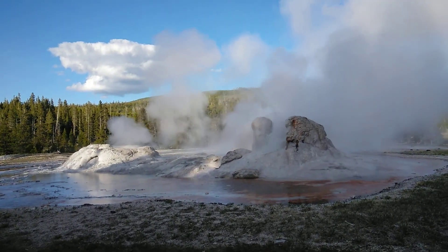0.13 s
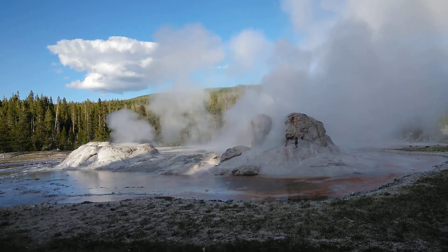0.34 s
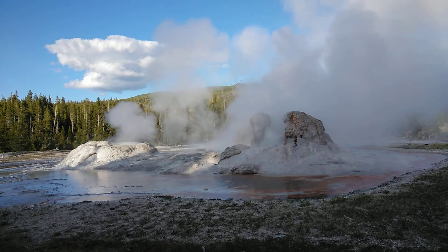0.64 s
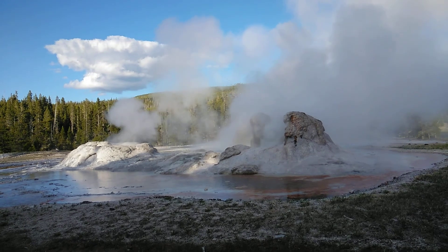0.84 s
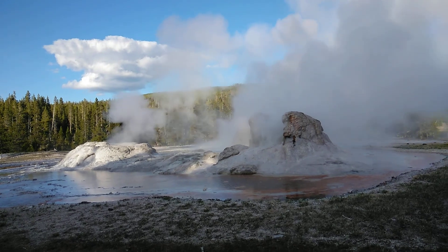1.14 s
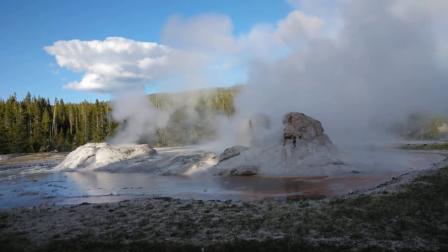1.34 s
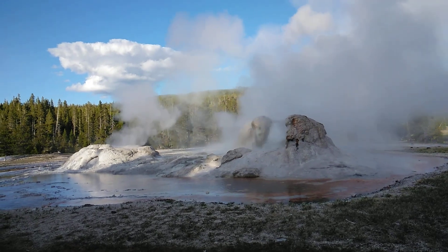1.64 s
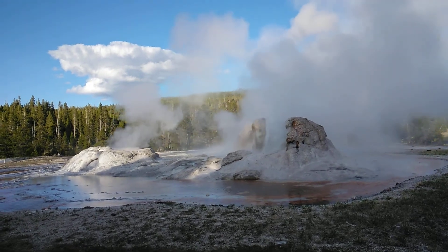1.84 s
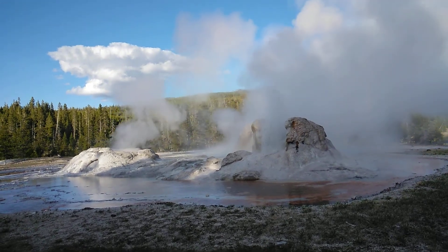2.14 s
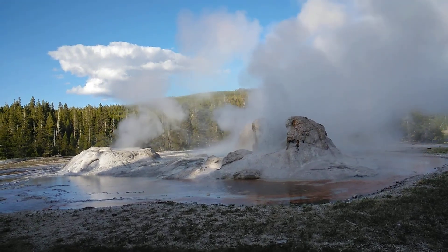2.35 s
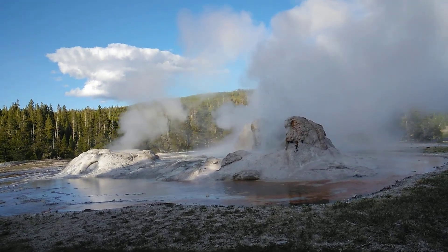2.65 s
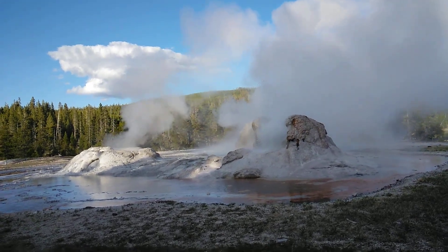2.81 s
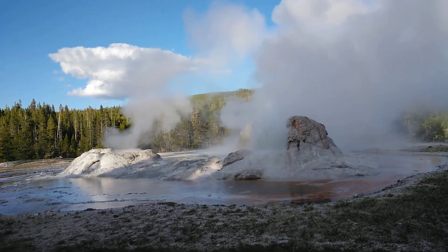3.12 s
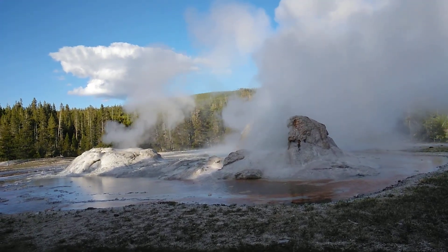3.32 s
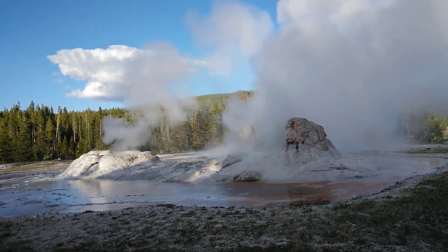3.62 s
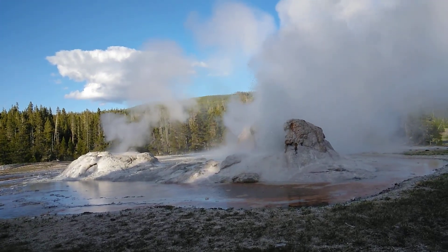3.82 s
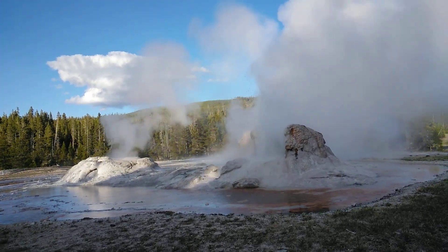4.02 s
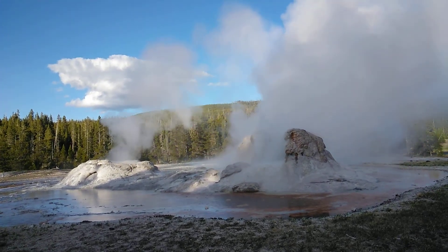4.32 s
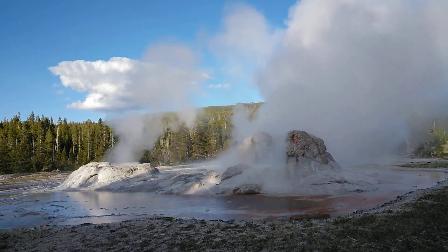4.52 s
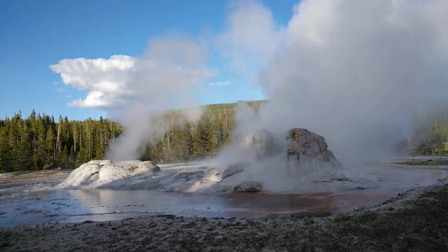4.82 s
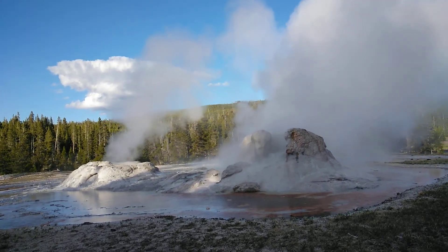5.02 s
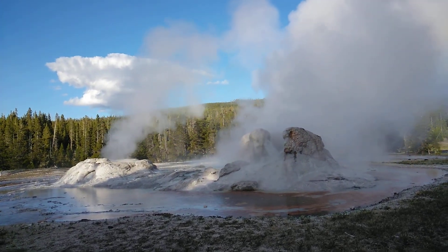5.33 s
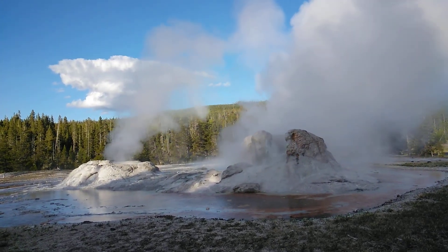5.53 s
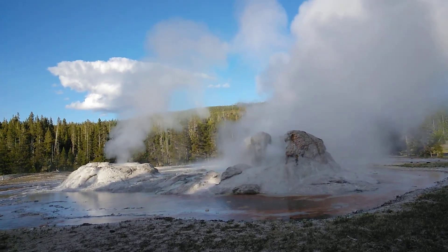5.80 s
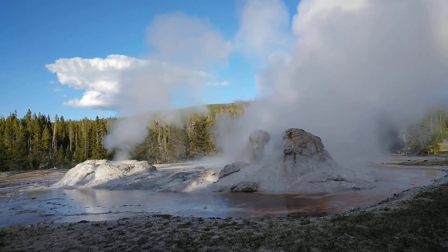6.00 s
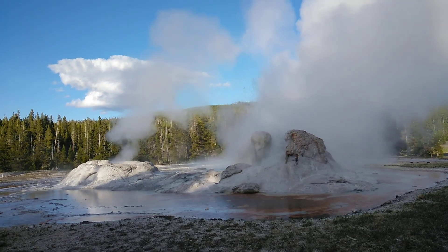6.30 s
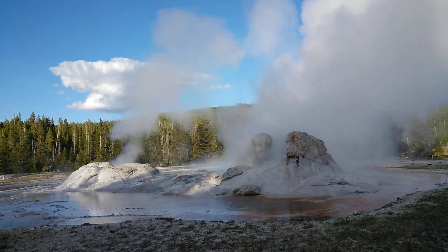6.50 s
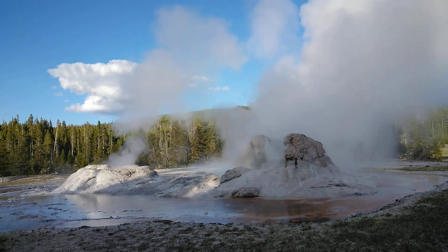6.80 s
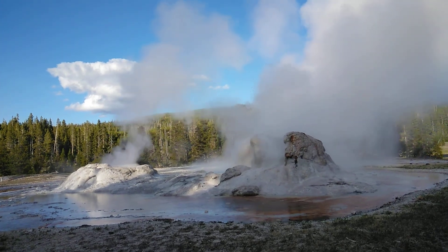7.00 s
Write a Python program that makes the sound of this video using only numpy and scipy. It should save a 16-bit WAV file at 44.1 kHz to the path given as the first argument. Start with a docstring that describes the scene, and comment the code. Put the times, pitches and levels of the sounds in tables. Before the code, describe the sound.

Low gusty wind and a throaty vent rumble run from start to end, in open air across a pool. From 0 to 1 s, splashing and steam hiss are moderate and rather dull, easing near 0.6 s. They rise a little around 1.0-1.5 s, then the hiss drops abruptly near 1.9 s. From 2.3 s the jet builds; at about 2.75 s wet slaps crowd in and bright spray patters. The strongest burst comes around 3.2-3.4 s, with sharp cracks and dense hiss. It eases near 3.85 s, then heavy splashing swells again around 4.3-4.7 s. After 4.9 s it collapses; 5.2-6.0 s is sparse, dark and mostly rumble, with faint dabs of water. From 6.1 s splash and hiss half return, modestly, to the end. Camera stereo, duller on the right, with patchy faint treble.

```python
"""A geyser across a shallow pool, on a camera's two microphone ports: wind and vent rumble low from the start.
Steam hisses from the cone, spray patters and heavier water splashes, all shaped from patchy noise and random drops.
Wet slaps join as short cracks of noise; the jet surges to its height midway, then drops to a faint lull and half recovers.
The ports colour the sound differently, and a level-dependent gain thins faint bands,
so the lull sounds sparse and dark."""
import sys
import numpy as np
from scipy import signal
from scipy.fft import rfft, irfft, next_fast_len
from scipy.io import wavfile
from scipy.ndimage import uniform_filter1d, map_coordinates

SR = 44100
rng = np.random.default_rng(int(sys.argv[2]) if len(sys.argv) > 2 else 0)


def dump_mix(stems):
    """Bounce the given channels to the path in sys.argv[1] as a 16-bit WAV at rate SR."""
    frames = np.atleast_2d(stems).T  # one column per channel
    limited = np.clip(frames, -1, 1)  # hard clip at full scale
    pcm = np.round(limited * 32767).astype(np.int16)
    wavfile.write(sys.argv[1], SR, pcm)


N = 315298  # length in samples

# Source levels are those ahead of the ports and the thinning of faint bands.
# Wind's rumble. Each row: time in seconds, level in dB.
WIND_LEVEL = [(0, -36), (0.14, -37), (0.32, -44), (0.5, -38.5), (0.66, -34), (0.78, -40), (0.98, -39),
              (1.2, -41), (1.32, -39), (1.65, -38.5), (1.95, -45.5), (2.65, -38.5), (3.05, -42),
              (3.38, -39.5), (3.83, -45), (4.05, -40), (4.5, -42), (4.78, -38.5), (5.17, -46.5),
              (5.52, -40.5), (5.8, -41), (6.15, -41), (6.5, -43), (6.8, -39), (7.15, -44)]
# Flutter of the wind within a gust: dB per unit of wobble, knots per second.
GUST_FLUTTER_DB, GUST_KNOTS_PER_S = 1.0, 12
# Low roar of the vent. Each row: time in seconds, level in dB ahead of the heaves.
ROAR_LEVEL = [(0, -40), (0.9, -40.5), (1.1, -42), (1.7, -37.5), (2.08, -42), (2.25, -39), (2.9, -39.5),
              (3.7, -38.5), (3.83, -40.5), (3.95, -38), (4.8, -40.5), (5.15, -42), (5.7, -42), (6.0, -43.5),
              (6.55, -43), (7.15, -42)]
# Heaves of the roar. Each row: centre in seconds, lift in dB (a dip if negative).
ROAR_HEAVES = [(0.65, 3), (1.32, 5.5), (1.6, -1.5), (3.4, 4), (4.74, 1.5), (5.46, 3), (6.97, 5)]
HEAVE_WIDTH_S = 0.06
# Strength of the jet. Each row: time in seconds, level of its steam hiss in dB ahead of the spurts.
JET_LEVEL = [(0.0, -40.5), (0.6, -43.5), (1.05, -37.5), (1.39, -36), (1.72, -41), (1.85, -39.5),
             (1.885, -49), (2.02, -47.5), (2.49, -40), (2.81, -31.5), (3.15, -30), (3.37, -24),
             (3.85, -33.5), (4.62, -28.5), (4.93, -33.5), (5.19, -48.5), (5.5, -53), (5.63, -52),
             (5.73, -48), (5.83, -52.5), (6.02, -49), (6.33, -44), (6.6, -45.5), (6.9, -43.5), (7.15, -45)]
# Thrown water follows the jet: its dB when the jet is at the reference dB, and dB gained per dB of jet.
SPRAY_DB, JET_REF_DB, SPRAY_DB_PER_JET_DB = -37, -35, 0.86
# Heavy water falling into the pool. Each row: time in seconds, level in dB ahead of the spurts.
FALL_LEVEL = [(0.0, -40.5), (0.65, -43.5), (1.05, -41), (1.3, -40), (1.75, -39.5), (1.97, -43.4),
              (2.35, -41.5), (2.75, -39), (3.1, -40), (3.35, -37.3), (3.83, -39), (4.1, -37.5), (4.45, -35),
              (4.85, -37.5), (5.02, -41.5), (5.16, -47.5), (5.33, -48), (5.58, -50.5), (5.82, -49),
              (5.99, -52), (6.11, -47), (6.35, -44.5), (6.7, -46.5), (7.15, -47)]
# Brightness of the splash. Each row: time in seconds, dB added above the split and taken away below it.
SPLASH_BRIGHTNESS = [(0, -1.7), (0.6, -0.9), (1.5, -0.5), (2.0, -0.7), (2.7, 0.5), (3.4, 0), (4.4, 0.8),
                     (5.1, 1), (5.5, -0.8), (6.0, 0.5), (6.4, 1.7), (7.15, -0.4)]
SPLASH_SPLIT_HZ = 1230
# The biggest clots slapping the rock. Each row: start in seconds, level in dB ahead of tilt and colour,
# brightness in dB per octave about the pivot.
SLAP_HITS = [(0.814, -45, 0), (1.041, -28, -2), (1.84, -31, 3), (2.154, -38, 0), (2.668, -31, 1),
             (2.702, -25, 0), (2.757, -31, -2), (2.768, -21, -1), (2.774, -22, -1), (2.803, -32, 0),
             (2.908, -20, -2), (2.97, -19.5, 2), (3.065, -24, 7), (3.186, -17, 3), (3.331, -19, 3),
             (3.335, -13, 3), (3.389, -15.5, 4), (3.491, -23, 1), (3.981, -29, -1), (3.996, -30, -2),
             (4.297, -23, -2), (4.304, -23, -2), (4.838, -23, 0), (4.907, -25, -3), (5.73, -39, 0),
             (5.76, -43, -2), (6.33, -40, 0), (6.464, -35, 2)]
SLAP_PIVOT_HZ = 7000
# Spurts: brief level changes of spray and splash. Each row: centre in seconds, change in dB (a dip if negative).
SPURT_CHANGES = [(1.18, 3), (1.31, 1.5), (2.77, 4.5), (2.91, 1.5), (2.97, 4), (3.34, 2.5), (3.99, 2),
                 (4.3, -1), (4.41, 4.5), (5.74, 0), (6.34, -0.5)]
SPURT_RISE_S, SPURT_FALL_S = 0.039, 0.027  # time constants of the change in dB, before and after its centre
SPURT_STEAM_SHARE = 0.32  # part of the change that the steam gets
# The colour of spray and splash drifts as the plume sways: depth in dB per unit, ripple spacing, speed.
SWAY_DB, SWAY_SPACING_HZ, SWAY_KNOTS_PER_S = 1.05, 218.4, 5

# Colour of each source. Each row: frequency in Hz, relative gain in dB.
WIND_COLOUR = [(20, -22), (40, -14), (65, -0.5), (95, 2), (140, -1.5), (250, -18), (600, -51)]
THROAT_COLOUR = [(40, -28), (80, -12.5), (125, 0.5), (170, -1.9), (240, -1), (320, -7), (420, -13.5),
                 (600, -24.5), (1200, -37.5), (3000, -62)]
STEAM_COLOUR = [(2500, -25.5), (4500, -8.5), (6000, -6), (6700, -5.5), (7500, -3.5), (8400, -5),
                (9200, -0.5), (9800, -0.5), (11000, -2), (12000, -4.5), (13200, -16.5), (14200, -16.5),
                (15300, -48)]
SPRAY_COLOUR = [(1500, -37), (2250, -12), (2750, -8.5), (3150, -15.5), (3900, -9.5), (4400, -3.5),
                (4750, -1), (5000, -1.5), (5350, -4.5), (5800, -9.5), (7000, -16.5), (12000, -44)]
SPLASH_COLOUR = [(200, -11), (450, 0), (650, 1), (780, 0.5), (1100, -0.5), (1600, -0.5), (2300, -1),
                 (2700, -3), (3500, -4.5), (5000, -8), (9000, -49)]
SLAP_COLOUR = [(300, -28), (1500, -7), (3500, -3.5), (5000, 4.5), (7000, -0.5), (10500, 7.5), (12500, -1),
               (15000, -28)]

# Shading of the right microphone port, chiefly in the treble. Each row: frequency in Hz, dB against the left.
RIGHT_SHADE = [(50, -2), (250, -1.5), (800, -4.5), (1600, -4.5), (2700, -4), (3300, 2), (4100, -5),
               (5000, -10.5), (6300, -7.5), (7500, -11.5), (9500, -20), (11500, -25.5), (13000, -17)]
# Narrow dips and peaks of each port, ahead of their drift. Each row: centre in Hz, width in Hz, gain in dB.
LEFT_NOTCHES = [(580, 78, -7.2), (1310, 100, -7), (1945, 87, -3.5), (3000, 250, 0), (3900, 74, -2.5),
                (5130, 150, 1), (6550, 120, -6), (8600, 120, 0.5)]
RIGHT_NOTCHES = [(595, 76, -7.8), (1370, 150, -0.5), (2080, 180, -1), (2870, 140, -2.5), (3630, 280, -3.5),
                 (3980, 110, 2.5), (4570, 230, -4), (5480, 150, -4)]
# Wander of the port responses in Hz, swing of dip depth (exponent), both per unit of wobble; knots per second.
DRIFT_HZ, DIP_SWING, DRIFT_KNOTS_PER_S = 32, 0.27, 9
# Likeness between the ports. Each row: frequency in Hz, likeness from 0 to 1.
PORT_LIKENESS = [(30, 0.92), (100, 1), (300, 0.99), (480, 0.93), (580, 0.94), (780, 0.89), (1100, 0.88),
                 (1300, 0.89), (1600, 0.68), (2000, 0.49), (2220, 0.55), (2800, 0.4), (2910, 0.985),
                 (3070, 0.94), (3160, 0.35), (3300, 0.59), (3430, 0.72), (3620, 0.68), (3880, 0.85),
                 (4050, 1), (4500, 0.39), (4900, 0.78), (5400, 0.36), (8000, 0.2), (13000, 0.11)]
# Phase between the ports. Each row: frequency in Hz, radians by which the left leads.
LEFT_LEAD = [(50, 3.5), (500, 3.5), (1100, 3.5), (1500, 4.5), (1850, 3.5), (2600, 4.5), (2900, 3.5),
             (3080, 4), (3190, -0.16), (3800, -0.1), (4350, 1.5), (4650, 1), (5400, 0.5), (7000, 0.4),
             (9500, 5.5)]
# Faint bands are turned down below this. Each row: frequency in Hz, threshold in dB per Hz ahead of its patches.
FAINT_THRESHOLD = [(100, -89), (400, -76.5), (490, -80), (640, -77.5), (800, -80), (1150, -82.5),
                   (1340, -80), (1600, -83), (1980, -83), (2400, -85.5), (3050, -82.5), (3400, -86),
                   (3800, -84), (4300, -89.5), (5000, -89.5), (10000, -105), (12500, -111), (15000, -110)]
TOP_HZ = 15550  # nothing is heard above this


def amp(db):
    """Decibels to gain."""
    return 10 ** (np.asarray(db) / 20)


def unit(x):
    """Scale to rms 1."""
    return x / np.sqrt(np.mean(x ** 2) + 1e-20)


def along(points, hz):
    """Read (Hz, value) points on a log frequency axis."""
    f, v = np.transpose(points)
    return np.interp(np.log(hz + 1), np.log(f + 1), v)


def curve(rows):
    """Draw (seconds, value) rows as one value per sample."""
    s, values = np.transpose(rows)
    return np.interp(np.arange(N) / SR, s, values)


def wobble(rate):
    """A smooth random curve through normal knots, rate of them a second."""
    knots = rng.standard_normal(int(N * rate / SR) + 4)
    return map_coordinates(knots, [np.arange(N) * rate / SR])


def filtered(x, response):
    """Multiply the spectrum of x by a response of frequency."""
    size = next_fast_len(N + SR // 2)
    hz = np.fft.rfftfreq(size, 1 / SR)
    return irfft(rfft(x, size) * response(hz), size)[..., :N]


def coloured(x, colour):
    """Shape x with a colour table, then bring it to rms 1."""
    return unit(filtered(x, lambda hz: amp(along(colour, hz))))


def smoothed(x, bands):
    """Running mean over neighbouring bands and seven time frames."""
    return uniform_filter1d(uniform_filter1d(x, size=bands, axis=-2), size=7, axis=-1)


def turbulence(patchy_db):
    """Two unrelated noises that share drifting patches of gain in time and frequency."""
    z = signal.stft(rng.standard_normal((2, N)), nperseg=1024)[2]
    patches = unit(smoothed(rng.standard_normal(z.shape[1:]), bands=4))
    return unit(signal.istft(z * amp(patchy_db * patches), nperseg=1024)[1][:, :N])


def rumble():
    """Wind gives a deep gusty rumble; above it the vent's throat roars and heaves now and then."""
    t = np.arange(N) / SR
    heave_db = sum(db * np.exp(-((t - s) / HEAVE_WIDTH_S) ** 2) for s, db in ROAR_HEAVES)
    roar_db = curve(ROAR_LEVEL) + heave_db + 0.77 * wobble(14)
    roar = amp(roar_db) * coloured(turbulence(patchy_db=2.0), THROAT_COLOUR)
    wind_db = curve(WIND_LEVEL) + GUST_FLUTTER_DB * wobble(GUST_KNOTS_PER_S)
    wind = amp(wind_db) * coloured(turbulence(patchy_db=1.6), WIND_COLOUR)
    return roar + wind


def patter(rate, spread_db, t60):
    """Drops land at random, rate a second: tiny noise bursts dying 60 dB in t60 seconds, a few much larger."""
    where, chance = rng.random((int(rate * N / SR), 2)).T
    size_db = spread_db * np.minimum(-np.log(1 - chance), 4)
    hits = np.bincount((where * N).astype(int), amp(size_db) ** 2, N)
    power = signal.lfilter([1], [1, -amp(-60 / (t60 * SR)) ** 2], hits)
    return unit(np.sqrt(power) * rng.standard_normal((2, N)))


def steam(level_db):
    """Steam tears out of the cone as turbulent hiss, laced with fine mist."""
    mist = patter(rate=1500, spread_db=4.0, t60=0.0097)
    hiss = turbulence(patchy_db=2.0) + 0.6 * mist
    return amp(level_db + 0.28 * wobble(25)) * coloured(hiss, STEAM_COLOUR)


def spray(jet_db, spurt_db):
    """Thrown drops patter back onto the rock, their level following the jet."""
    level_db = SPRAY_DB + SPRAY_DB_PER_JET_DB * (jet_db - JET_REF_DB) + spurt_db
    drops = 1.6 * turbulence(patchy_db=1.6) + patter(rate=900, spread_db=5.0, t60=0.0097)
    return amp(level_db + 0.46 * wobble(22.01)) * coloured(drops, SPRAY_COLOUR)


def bubbles(rate, centre_hz, cycles, spread_db, count=600):
    """Air pockets ring for a few cycles in the pool, rising in pitch as they surface."""
    when, size, pitch, phase = rng.random((int(rate * N / SR), 4)).T[:, :, None]
    start_hz = centre_hz * 2 ** (2 * pitch - 1)  # within an octave either way
    turns = start_hz * np.arange(count) / SR
    ring = amp(abs(spread_db) * size ** 2) * np.exp(-turns / cycles) * (1 - np.exp(-turns))
    angle = 2 * np.pi * (turns * (1 + 0.021 * turns / cycles) + phase)
    at = ((when * N).astype(int) + np.arange(count)).ravel()
    # sine and cosine give each bubble a quarter turn between the two signals
    pair = [np.bincount(at, (ring * wave(angle)).ravel(), N)[:N] for wave in (np.sin, np.cos)]
    return unit(np.array(pair))


def splash(spurt_db):
    """Heavier water falls into the pool and churns up bubbles: thick slugs sound dull, thin sheets bright."""
    falling = patter(rate=700, spread_db=2.6, t60=0.014)
    churning = bubbles(rate=600, centre_hz=1500, cycles=5, spread_db=10)
    mix = turbulence(patchy_db=1.5) + 0.47 * falling + 0.17 * churning
    water = coloured(mix, SPLASH_COLOUR)
    deep = filtered(water, lambda hz: 1 / (1 + (hz / SPLASH_SPLIT_HZ) ** 6))
    tilt_db = curve(SPLASH_BRIGHTNESS) + 0.5 * wobble(12)
    tilted = amp(-tilt_db) * deep + amp(tilt_db) * (water - deep)
    return amp(curve(FALL_LEVEL) + spurt_db + 0.9 * wobble(14)) * tilted


def swaying(x):
    """Slow, broad swells and hollows drift through the spectrum."""
    hz, s, z = signal.stft(x, SR, nperseg=1024)
    knots = rng.standard_normal((160, 80))  # frequency by time
    places = np.meshgrid(hz / SWAY_SPACING_HZ, s * SWAY_KNOTS_PER_S, indexing="ij")
    field = map_coordinates(knots, places, mode="mirror")
    return signal.istft(z * amp(SWAY_DB * field), SR, nperseg=1024)[1][:, :N]


def slaps(t60):
    """Single clots of water hit with a short wet crack: thin ones bright, thick ones dull."""
    t = np.arange(SR // 40) / SR
    hz = np.maximum(np.fft.rfftfreq(len(t), 1 / SR), 1000)  # the tilt is level below 1 kHz
    octaves = np.log2(hz / SLAP_PIVOT_HZ)
    cracks = np.zeros((2, N))
    for s, db, tilt_db in SLAP_HITS:
        noise = rng.standard_normal((2, len(t)))
        burst = irfft(rfft(noise) * amp(tilt_db * octaves), len(t))
        cracks[:, round(s * SR):][:, :len(t)] += amp(db - 60 * t / t60) * burst
    return filtered(cracks, lambda hz: amp(along(SLAP_COLOUR, hz)))


def spurts():
    """Brief changes in dB, each growing quickly to its centre and fading faster after it."""
    t = np.arange(N) / SR
    change_db = 0
    for s, db in SPURT_CHANGES:
        distance = np.maximum((s - t) / SPURT_RISE_S, (t - s) / SPURT_FALL_S)
        change_db = change_db + db * np.exp(-distance)
    return change_db


def ports(pair):
    """Two unrelated signals reach the ports: partly alike, shifted in phase, each with its own wandering dips."""
    hz, s, (a, b) = signal.stft(pair, SR, nperseg=2048)

    def drift():
        """One wobble read at the time frames."""
        return np.interp(s, np.arange(N) / SR, wobble(DRIFT_KNOTS_PER_S))

    hz = np.abs(hz[:, None] + DRIFT_HZ * drift())

    def dips(rows):
        """Sum of bell-shaped dips and peaks in dB, each swinging in depth."""
        return sum(db * np.exp(DIP_SWING * drift() - ((hz - centre) / width) ** 2)
                   for centre, width, db in rows)

    turn = np.arccos(np.clip(along(PORT_LIKENESS, hz), 0, 0.999)) / 2
    common, apart = a * np.cos(turn), b * np.sin(turn)
    left = (common + apart) * amp(dips(LEFT_NOTCHES))
    right = (common - apart) * amp(dips(RIGHT_NOTCHES) + along(RIGHT_SHADE, hz))
    right = right * np.exp(-1j * along(LEFT_LEAD, hz))
    return signal.istft(np.array([left, right]), SR, nperseg=2048)[1][:, :N]


def scene():
    """The jet drives hiss and spray; they surge and flutter together, and spurts move the splash too."""
    jet_db = curve(JET_LEVEL) + 0.75 * wobble(20)
    spurt_db = spurts()
    low = rumble()
    hiss = steam(jet_db + SPURT_STEAM_SHARE * spurt_db)
    water = swaying(spray(jet_db, spurt_db) + splash(spurt_db)) + slaps(t60=0.008)
    return ports(low + hiss + water)


def thin_faint(x, depth_db, steep, patchy_db):
    """Turn down bands of low running power, to depth_db at most; a random field makes faint hiss patchy."""
    hz, _, z = signal.stft(x, SR, nperseg=1024, scaling="psd")
    power = np.abs(smoothed(2 * np.abs(z) ** 2, bands=2)) + 1e-20
    patchiness = unit(smoothed(rng.standard_normal(z.shape[1:]), bands=4))
    threshold = amp(along(FAINT_THRESHOLD, hz)[:, None] + patchy_db * patchiness)
    gain = 1 / np.sqrt(1 + (threshold ** 2 / power) ** steep)
    gain = np.maximum(gain, amp(depth_db))
    return signal.istft(z * gain, SR, nperseg=1024, scaling="psd")[1][:, :N]


def record(dry):
    """Faint bands are thinned and nothing is kept above the band limit."""
    thinned = thin_faint(dry, depth_db=-18, steep=4.1, patchy_db=2.0)
    return filtered(thinned, lambda hz: hz < TOP_HZ)


dry = scene()
out = record(dry)
dump_mix(out)
```